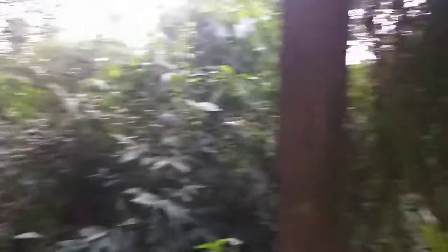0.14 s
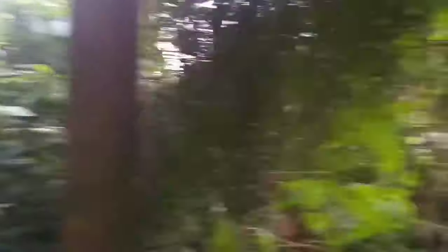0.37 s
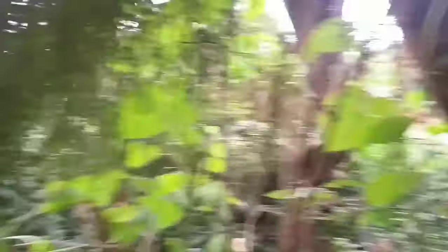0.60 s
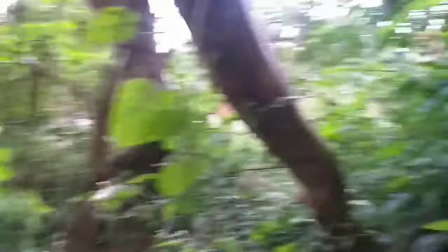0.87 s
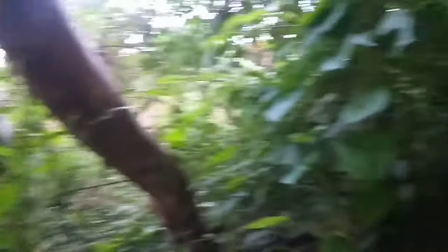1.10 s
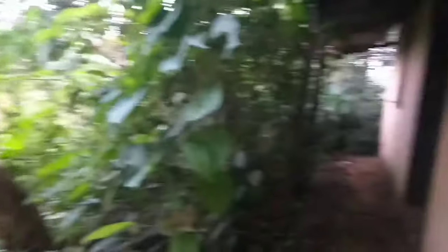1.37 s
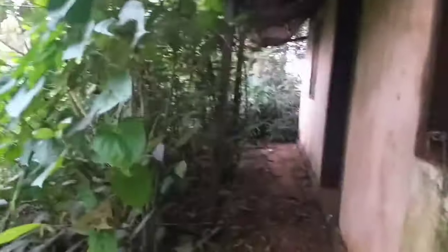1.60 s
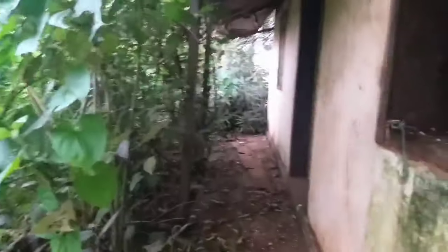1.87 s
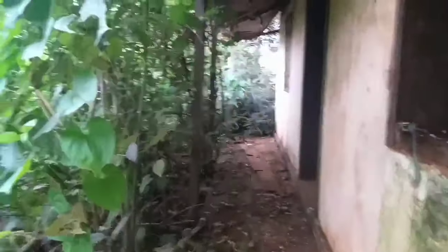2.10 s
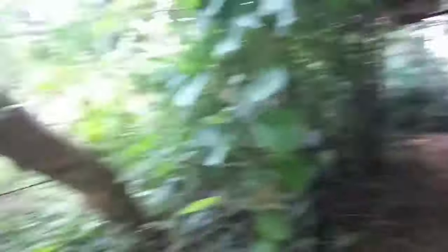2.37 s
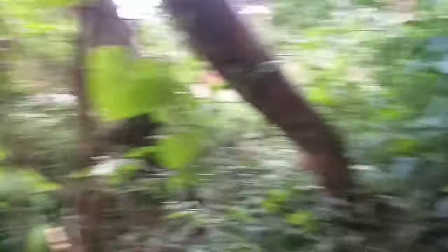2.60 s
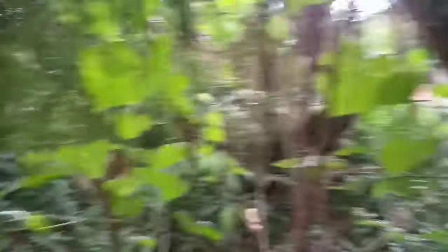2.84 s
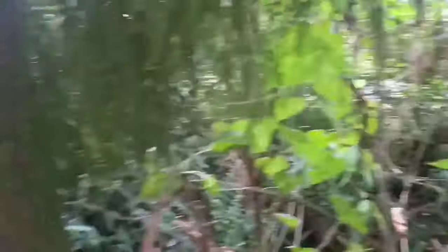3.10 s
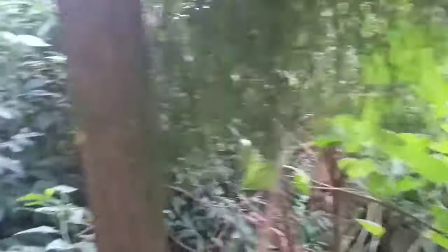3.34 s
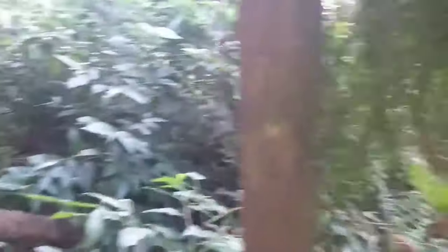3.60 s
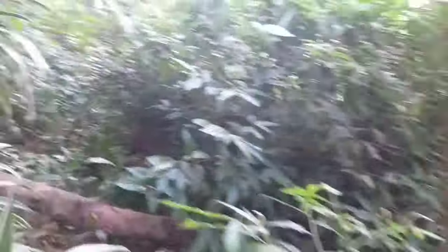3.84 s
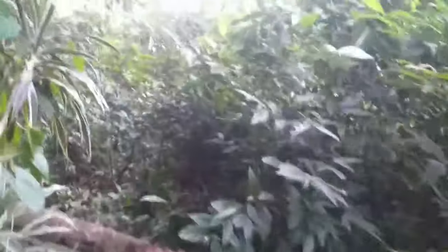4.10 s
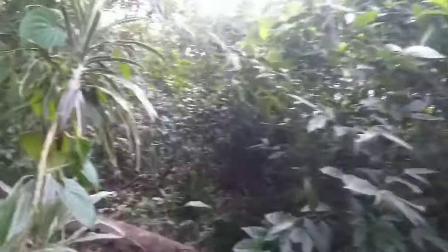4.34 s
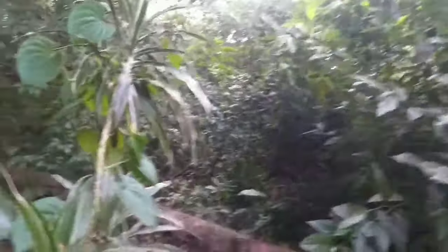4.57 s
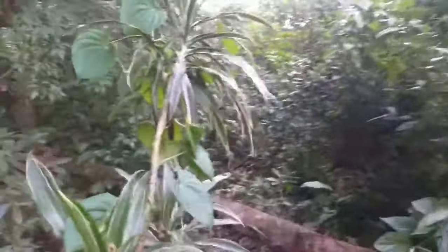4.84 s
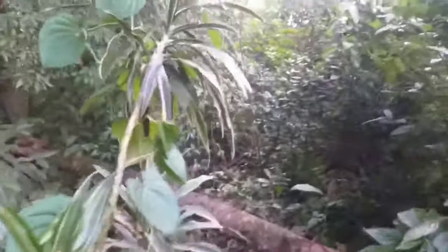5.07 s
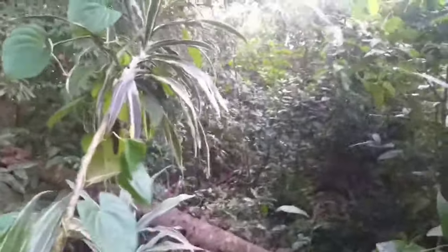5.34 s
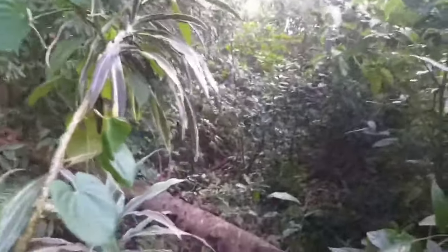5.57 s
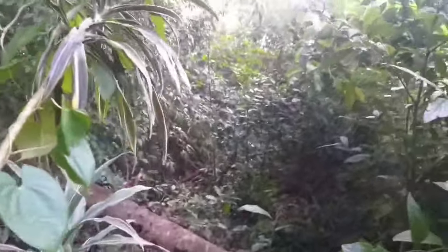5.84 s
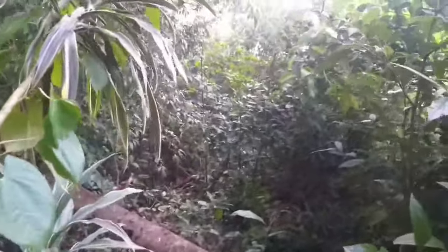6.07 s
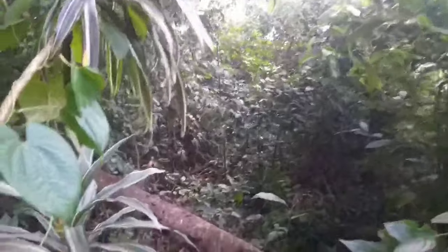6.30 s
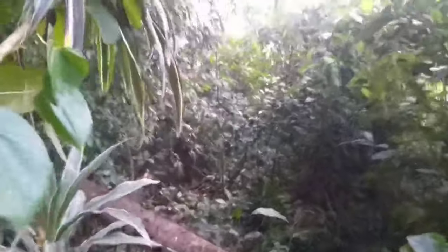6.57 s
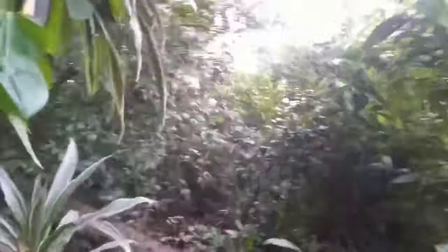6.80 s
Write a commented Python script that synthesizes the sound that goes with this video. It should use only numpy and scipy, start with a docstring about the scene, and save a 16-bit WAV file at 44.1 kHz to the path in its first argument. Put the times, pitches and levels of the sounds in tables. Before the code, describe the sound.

Close leaf swishes and dry litter crunches swell with each movement outdoors, building from near quiet to sharp twig cracks and a low microphone bump.

```python
"""In dense dry undergrowth, two close microphone ports hear nearly the same sound: still air as shaped noise,
a steady very high whine as a sine, and someone turning and pushing through the growth. Leaves and litter are
crackling noise that swells with each movement; twigs snap as short bursts with a ring, thickest late on.
A thin buzz of narrow noise comes in spells from 0.3 s; a bird whistles gliding sines far off from 1.4 s.
Near the end the microphone is bumped, a low lumpy noise."""
import sys
import numpy as np
from scipy import signal
from scipy.fft import rfft, irfft
from scipy.io import wavfile
from scipy.ndimage import uniform_filter1d

SR = 44100
rng = np.random.default_rng(int(sys.argv[2]) if len(sys.argv) > 2 else 0)


def makeup_ratio(level_db):
    """Linear amplitude ratio for a level in decibels (20 dB per factor of ten)."""
    decades = np.asarray(level_db, float) / 20
    return 10 ** decades


def output_pcm(signal):
    """Save a mono or channel-first signal as 16-bit PCM at the path in sys.argv[1].

    Samples are clipped to [-1, 1] before scaling.
    """
    pcm = np.clip(np.atleast_2d(signal).T, -1, 1) * 32767
    wavfile.write(sys.argv[1], SR, np.round(pcm).astype(np.int16))


N = 306054


def rms_one(x):
    """Scale to rms 1."""
    return x / np.sqrt(np.mean(x ** 2) + 1e-20)


def peak_one(x):
    """Scale to peak 1."""
    return x / np.abs(x).max()


def in_time(rows):
    """One value per sample for each column after the time, in straight lines between rows."""
    s, *columns = np.transpose(rows)
    return [np.interp(np.arange(N) / SR, s, column) for column in columns]


def colour(x, spectrum):
    """Shape a steady sound by a spectrum, in straight lines over log frequency."""
    hz, db = np.transpose(spectrum)
    grid = np.maximum(np.fft.rfftfreq(N, 1 / SR), 1)
    gain = makeup_ratio(np.interp(np.log(grid), np.log(hz), db))
    return irfft(rfft(x) * gain, N)


def band(x, low_hz, high_hz):
    """Band-pass."""
    return signal.sosfilt(signal.butter(2, [low_hz, high_hz], "band", fs=SR, output="sos"), x)


def resonance(x, hz, width_hz):
    """Two-pole resonance with a gain of about 1 at its top."""
    r = np.exp(-np.pi * width_hz / SR)
    poles = [1, -2 * r * np.cos(2 * np.pi * hz / SR), r * r]
    return signal.lfilter([(1 - r * r) / 2, 0, (r * r - 1) / 2], poles, x)


def fade(clicks, t60_s):
    """Each click jumps up and dies away, 60 dB in t60_s."""
    return signal.lfilter([1], [1, -makeup_ratio(-60 / (t60_s * SR))], clicks + 1e-18)


def drift(rate_hz):
    """Slow random wandering of rms 1."""
    r = np.exp(-2 * np.pi * rate_hz / SR)
    wander = signal.lfilter([1], [1, -2 * r, r * r], rng.standard_normal(N + SR))
    return rms_one(wander[SR:])   # the first second only settles the filter


def narrow(rows):
    """Noise twice through one resonance, under a bell-shaped swell."""
    out = np.zeros(N)
    for s, length, hz, width_hz, db in rows:
        a, b = max(round((s - .5) * SR), 0), min(round((s + .5) * SR), N)
        tone = resonance(resonance(rng.standard_normal(b - a), hz, width_hz), hz, width_hz)
        bell = np.exp(-.5 * ((np.arange(a, b) / SR - s) / length) ** 2)
        out[a:b] += makeup_ratio(db) * rms_one(tone) * bell
    return out


# Still air around the microphone, its spectrum. Each row: frequency in Hz, relative density in dB per Hz.
AIR = [(24, -34), (40, -1.5), (91, 6), (161, 1), (278, -9), (365, -9), (557, -11.5), (616, -14.5),
       (1430, -17), (2240, -22), (3100, -17.5), (12200, -32), (14100, -23), (15200, -12)]


def still_air():
    """Steady shaped noise, low-heavy; a second, weaker one differs between left and right."""
    air, apart = (makeup_ratio(-68.5) * rms_one(colour(n, AIR)) for n in rng.standard_normal((2, N)))
    highest = band(band(rng.standard_normal(N), 14300, 15750), 14300, 15750)
    side = makeup_ratio(-25) * band(apart, 20, 1500)
    return air + makeup_ratio(-94) * highest + side * np.array([[1], [-1]])


def whine():
    """A steady very high sine, wavering slightly in pitch and level."""
    hz = 15387 + 3.0 * drift(.4)
    level = makeup_ratio(-65.5 + 1.0 * drift(8))   # rms
    return np.sqrt(2) * level * np.sin(2 * np.pi * np.cumsum(hz) / SR)


# Movements close by. Each row: peak time in seconds, length in seconds, level in dB,
# weight in dB (more of the heavy layers), shine in dB (more of the bright ones).
# Green leaves swish past, about every 0.18 s while the person turns.
SWISHES = [(0.712, .05, -49, 17, -20), (0.735, 0.15, -44.5, 7, -2), (0.97, .16, -52.5, -6, 3),
           (1.21, 0.17, -49.5, -24, -5), (3.103, 0.16, -43.5, 4, 0), (3.277, 0.17, -41.5, -9, -1),
           (3.452, 0.19, -42.5, -23, 2), (3.614, 0.18, -43.5, 13, 8), (3.782, 0.24, -40.5, 12.5, 3.5),
           (3.997, 0.18, -39, -15, 3), (4.16, .22, -42.5, 3, 5), (4.346, 0.21, -40.5, -26, 3),
           (5.913, 0.027, -45.5, 7, 2)]
# Whole branches are shoved aside.
SHOVES = [(0.0, 0.19, -58, 11, -3.5), (0.08, 0.12, -65, -3, 5), (0.194, 0.061, -66, 5, -1),
          (0.81, 0.23, -53.5, -13, -0.5), (0.929, 0.1, -41, -8, -5), (2.605, 0.18, -50, 7, 3),
          (3.725, 0.38, -50, 8, -2.5), (3.855, .17, -37, 0, -1.5), (3.946, 0.19, -48.5, -0.5, -5),
          (4.527, 0.11, -39, 4, 5.5), (4.732, 0.17, -45, 3, -2), (5.286, 0.14, -48.5, -1, -0.5),
          (5.567, 0.34, -47, 1.5, -2.5), (6.504, 0.39, -52.5, -9, 1.5), (6.753, .17, -33, 6.5, 3),
          (6.82, 0.12, -42, 11, -20), (6.881, 0.24, -42.5, 0, 0.5)]
# Dry litter crunches underfoot.
CRUNCHES = [(0.056, .12, -68, 0, -7), (0.164, 0.092, -60.5, -3, -15), (0.365, 0.16, -68, 11, 2.5),
            (2.699, 0.11, -57.5, 0, 5.5), (2.845, 0.044, -50, -6, -0.5), (2.89, 0.13, -57.5, 10, -2),
            (2.968, 0.19, -54.5, 1, -0.5), (3.053, 0.12, -59.5, 3, 0), (3.197, 0.23, -56.5, 0, 2),
            (3.317, 0.051, -52.5, -6, 5), (4.084, 0.36, -51.5, 3.5, 3), (4.579, 0.2, -39.5, 4.5, 0.5),
            (4.677, 0.097, -49.5, 21, 8), (4.83, .13, -63, -12, 3), (5.018, 0.6, -54, 3, 0.5),
            (5.148, .14, -62, -11, 8.5), (5.353, 0.12, -45, 1.5, -2.5), (5.458, .12, -52, 0, 2.5),
            (5.668, 0.12, -46.5, 4.5, -3.5), (5.766, 0.053, -54.5, -16, 10.5), (5.832, 0.31, -51, 2, -2),
            (5.976, 0.12, -53, -21, 4.5), (6.02, .1, -47, -10, -29), (6.163, 0.48, -54, 8.5, 3.5),
            (6.265, 0.2, -50, 3, -5), (6.376, 0.42, -52.5, -12, 2), (6.424, 0.19, -50.5, -16.5, -2),
            (6.604, 0.29, -48, 0, 1.5), (6.666, 0.17, -44.5, 10, 0), (6.711, 0.16, -38, 10, -3)]
# Thick stems bend and knock.
BENDS = [(.13, 0.59, -70, 2, 0), (0.301, 0.25, -63.5, 2.5, 1), (2.802, 0.18, -77, 3, 0),
         (3.592, 0.031, -53, 3, 0), (3.657, 0.052, -65, 0, 0), (3.9, 0.24, -62, 0, 0),
         (4.591, 0.072, -48.5, 6.5, 4), (5.085, 0.1, -62, -4, 0), (5.274, 0.18, -64, 1.5, 3)]
# One row per kind: swish, shove, crunch, debris, bend.
# Each row: share of the length spent rising, roundness of the top, dryness from 0 to 1.
MOVES = [(0.34, 1.33, 0.2), (0.47, 1.41, 0.37), (.45, 1.53, 0.83), (0.37, 0.84, 0.65), (.3, 0.68, 0.7)]
# What each layer takes of the movements, from stems to leaf edges. Each row: swish, shove, crunch, debris,
# bend and settling in dB, then the share of weight and the share of shine.
TAKES = [(-42, -24.5, -31, -14, -2, -23, 1.04, 0.25), (-28, -11, -16.5, 1.8, -9, -16, 0.68, .0),
         (-8.5, -2.5, -3, -10, -18, -5, 0.18, .0), (-8, 0, -1.6, 7.3, -22, -11, 0.073, 0.19),
         (-2, -6, -10.5, 3, -28, -13, 0.01, 0.59), (-13, -2, -6, 4, -28, -9, 0.078, 1.17),
         (-21, -7.5, -13, 2.5, -32, -12, 0.18, 1.37)]
# The undergrowth settles between movements. Each row: time in seconds, level in dB.
SETTLE = [(0, -74), (.3, -63.5), (.5, -72), (.66, -70.5), (1.1, -73), (1.4, -76), (2.43, -80.5), (2.8, -65),
          (3.4, -65), (4.3, -66.5), (4.9, -68), (5.2, -56.5), (5.7, -69), (6.2, -67), (6.94, -57.5)]
SETTLE_DRYNESS = 0.72


def pushing():
    """Every movement swells and dies by one rule; powers add up in each layer, dryness mixes by power."""
    t, takes = np.arange(0, N, 128) / SR, np.array(TAKES)
    weight_share, shine_share = takes[:, [6]], takes[:, [7]]
    # bits rain down just after every snap
    debris = [(s + 0.033, 0.13, db - 47, 0, 0) for s, db, *_ in SNAPS]
    settle = makeup_ratio(np.interp(t, *np.transpose(SETTLE))) ** 2
    power = makeup_ratio(takes[:, [5]]) ** 2 * settle
    dry_power, total = SETTLE_DRYNESS * settle, settle
    kinds = [SWISHES, SHOVES, CRUNCHES, debris, BENDS]
    for kind, (rows, (rising, roundness, dryness)) in enumerate(zip(kinds, MOVES)):
        for s, length, db, weight_db, shine_db in rows:
            away = np.maximum((s - t) / rising, (t - s) / (1 - rising)) / length
            swell = makeup_ratio(db - 20 * away ** roundness) ** 2   # 20 dB down at both ends of the length
            gain_db = takes[:, [kind]] + weight_db * weight_share + shine_db * shine_share
            power = power + swell * makeup_ratio(gain_db) ** 2
            dry_power, total = dry_power + dryness * swell, total + swell
    curves = [*np.sqrt(power), dry_power / total]
    return [np.interp(np.arange(N) / SR, t, curve) for curve in curves]


# Layers of the rustle, from stems to leaf edges. Each row: low edge in Hz, high edge in Hz,
# crackles per second, crackle depth in dB per unit of size, crackle decay (t60) in seconds.
LAYERS = [(304, 728, 53, 1.5, 0.25), (696, 1594, 150, 6.5, 0.011), (1540, 2880, 120, 4.5, 0.029),
          (2700, 4620, 180, 7.5, 0.0038), (4060, 6640, 260, 0.5, 0.037), (5800, 10400, 160, 3.5, 0.023),
          (10130, 14200, 460, 3.5, 0.044)]
# Broad resonances of the rustle. Each row: frequency in Hz, relative density in dB per Hz.
BRUSH = [(150, -39), (260, -11), (460, -6), (800, -7), (1350, -2), (1900, 5), (2600, -1.5), (3450, -1.5),
         (4300, -7), (5200, -6.5), (6600, -9), (8300, -4), (10300, -17), (15700, -14)]


def brush():
    """Rubbing noise broken up by crackles of very uneven size; one crackle is heard in several layers at once."""
    out = 0
    chance, size = rng.random(N), np.minimum(rng.exponential(1, N), 3)
    *levels, dryness = pushing()
    for level, (low_hz, high_hz, per_s, depth_db, t60_s) in zip(levels, LAYERS):
        crackles = (chance < per_s / SR) * makeup_ratio(depth_db * size) * dryness
        texture = (1 + fade(crackles, t60_s)) * makeup_ratio(1.32 * drift(26.5))
        # crackling takes its energy from the smooth rubbing
        texture = texture / np.sqrt(uniform_filter1d(texture ** 2, size=SR // 8))
        rub = colour(rng.standard_normal(N) * texture, BRUSH)
        rub = band(band(rub, low_hz, high_hz), 0.67 * low_hz, 1.15 * high_hz)
        # single leaves and twigs ring out by turns, so the colour keeps shifting
        for hz in np.geomspace(low_hz, high_hz, 6)[1:-1]:
            ring_gain = makeup_ratio(-11.5 + 3.3 * np.clip(drift(9.3), -2, 2))
            rub = rub + ring_gain * resonance(rub, hz, 0.085 * hz)
        out = out + level * rms_one(rub)
    return out


# Rubbed stems and leaves close by. Each row: middle in seconds, length (bell spread) in seconds,
# pitch in Hz, width in Hz, level at the middle in dB.
SINGING = [(.1, 0.15, 1880, 350, -63), (.16, 0.062, 3560, 350, -68), (.36, .03, 1950, 300, -56.5),
           (.73, 0.016, 5150, 500, -43.5), (.72, 0.013, 2510, 400, -52), (.93, 0.012, 2020, 400, -46),
           (1.03, 0.035, 5200, 600, -66), (2.842, 0.0053, 1600, 400, -43.5), (3.1, 0.016, 5000, 500, -52),
           (3.13, 0.061, 1470, 400, -64.5), (3.44, 0.022, 1950, 400, -55), (4.96, 0.01, 1930, 200, -62),
           (5.98, 0.0093, 3280, 400, -47)]


def singing():
    """A rubbed stem or leaf sings in one narrow band."""
    return narrow(SINGING)


# Twig snaps, the loud ones near. Each row: time in seconds, peak level in dB, ring in Hz,
# low part in dB and high part in dB (both before the fixed gains in snaps()).
SNAPS = [(0.153, -46, 2020, -31, -21), (0.184, -41.5, 3520, -21, -3), (0.361, -38, 1920, -38, -20),
         (0.375, -43, 1880, -33, -20), (0.711, -43, 2580, -21, -26), (0.725, -45, 2580, -45, -27),
         (0.911, -32, 2030, -29, -23), (0.92, -33.5, 1900, -29, -24), (2.205, -57.5, 1950, -3, -20),
         (2.68, -29, 3800, -43, -6.5), (2.686, -36, 3740, -39, -23), (2.834, -32.5, 1900, -49, -21),
         (2.861, -37, 1820, -49, -22), (2.912, -39, 1770, -33, -11), (2.933, -32, 1900, -39, -11),
         (2.967, -32, 1900, -37, -9), (3.058, -37, 3380, -30, -23), (3.21, -38, 2730, -30, -8),
         (3.59, -27, 3500, -21.5, -17), (3.663, -29, 3110, -15, -11), (3.863, -21, 1890, -39, -19),
         (4.032, -25, 3250, -36, -13), (4.081, -13.5, 3260, -63, -13), (4.368, -33.5, 3600, -32, -24),
         (4.482, -29, 1890, -27, -13), (4.5, -20.5, 4200, -31, -15), (4.619, -25.5, 2850, -23, -22),
         (4.663, -27.5, 2880, -6.5, -15), (4.74, -35, 3160, -11, -10), (4.763, -5, 1250, -21, -13.5),
         (4.819, -13.5, 4400, -29, -7.5), (4.918, -40, 2920, -32, -16), (5.009, -34, 1920, -39, -2),
         (5.043, -40, 1970, -6, -1), (5.062, -19.5, 3800, -14.5, -7.5), (5.109, -28.5, 2010, -39, -17),
         (5.138, -35, 3610, -34, -15), (5.145, -28.5, 3300, -53, -8.5), (5.439, -36, 3500, -21, -16),
         (5.528, -27.5, 3300, -23.5, -29), (5.612, -26.5, 3000, -38, -25), (5.678, -32, 3570, -37, -28),
         (5.748, -32.5, 3700, -33, -8.5), (5.78, -34, 3190, -33, -26), (5.829, -27, 3000, -37, -22),
         (5.886, -17.5, 3630, -54, -7), (5.956, -33.5, 3800, -40, -1), (5.977, -38, 3250, -38, -28),
         (6.048, -3.5, 1690, -20.5, -19), (6.101, -18.5, 2000, -20.5, -23), (6.24, -52, 3070, -8, 6),
         (6.272, -8.5, 3630, -23, -10.5), (6.335, -28, 2010, -21, -10), (6.423, -28, 3820, -38, -14),
         (6.544, -37, 3150, -39, -16), (6.596, -23, 3430, -50, -10), (6.643, -26, 1900, -37, -24),
         (6.672, -25, 2940, -22, -24), (6.717, -8.5, 3450, -42, -36), (6.729, -1.5, 2530, -52, -4.5),
         (6.762, -1, 3220, -27, -8.5), (6.808, -19, 1950, -18.5, -22), (6.921, -25, 2770, -41, -22)]
# Edges between the low, middle, high and top parts of a snap [Hz].
SNAP_EDGES = [380, 1300, 4500, 10500, 16800]


def snaps():
    """Fibres tear for under a millisecond and crack, the twig rings briefly, leaves and wall scatter a tail."""
    out, t = np.zeros(N), np.arange(SR // 5) / SR
    noise = rng.standard_normal((len(SNAPS), 2, len(t)))
    tear = np.clip(t / 0.00084, 0, 1) ** 2
    for (s, peak_db, ring_hz, low_db, high_db), (burst, scatter) in zip(SNAPS, noise):
        tail = makeup_ratio(-15.5) * scatter * makeup_ratio(-60 * t / 0.1)   # t60 0.1 s
        crack = tear * (burst * makeup_ratio(-60 * t / 0.018) + tail)
        crack[round(.0007 * SR)] += 4.0   # the break itself
        low, middle, high, top = (band(crack, *edges) for edges in zip(SNAP_EDGES, SNAP_EDGES[1:]))
        middle = middle + makeup_ratio(10.0) * resonance(crack, ring_hz, 640)
        # thick twigs sound low, thin ones high
        shaped = makeup_ratio(low_db + 3.5) * peak_one(band(low, 300, 2500)) + peak_one(middle)
        shaped = shaped + makeup_ratio(high_db + 12.0) * peak_one(high)
        # loud snaps are near and keep more of their top, thin ones too
        shaped = shaped + makeup_ratio(11.5 + 0.44 * peak_db + 0.87 * high_db) * peak_one(top)
        at = round(s * SR)
        out[at:at + len(t)] += (makeup_ratio(peak_db) * peak_one(shaped))[:N - at]
    return out


# Spells of insect buzzing. Each row: start in seconds, end in seconds, level in dB.
BUZZ = [(.3, 1.2, -82), (1.36, 2.06, -86), (2.74, 3.1, -78)]


def buzzing():
    """A thin insect buzz: narrow noise of uneven level, broken into spells."""
    hz, width_hz = 5630, 120
    buzz = resonance(resonance(rng.standard_normal(N), hz, width_hz), hz, width_hz)
    t = np.arange(N) / SR
    spells = 0
    for start, end, db in BUZZ:
        spells = spells + makeup_ratio(db) * np.clip(np.minimum(t - start, end - t) / 0.042, 0, 1)
    return spells * makeup_ratio(1.5 * drift(7.2)) * rms_one(buzz)


# A bird far off, two slurred phrases. Each row of a phrase: time in seconds, pitch in Hz,
# level in dB before flutter and echo.
BIRD = [
    [(1.41, 2130, -80), (1.46, 2120, -70), (1.52, 2080, -84), (1.575, 2160, -64.5), (1.62, 2200, -83),
     (1.68, 2350, -74), (1.75, 2740, -68), (1.8, 2780, -89)],
    [(1.91, 2730, -76), (1.93, 2660, -69), (1.97, 2475, -72), (2.05, 2300, -84), (2.13, 2070, -77),
     (2.22, 2170, -82), (2.3, 2330, -78), (2.36, 2570, -74), (2.43, 2700, -84)],
]
# Short far notes. Each row: middle in seconds, length (bell spread) in seconds, pitch in Hz, width in Hz,
# level at the middle in dB.
NOTES = [(1.747, 0.042, 2420, 60, -74), (1.79, 0.04, 7560, 900, -71.5), (2.078, 0.031, 643, 45, -73)]


def birds():
    """Gliding whistles blurred by echoes among the trees, and a few short notes."""
    t, out = np.arange(N) / SR, np.zeros(N)
    for phrase in BIRD:
        hz, db = in_time(phrase)
        on = np.clip(np.minimum(t - phrase[0][0], phrase[-1][0] - t) / 0.021, 0, 1)
        whistle = np.sin(2 * np.pi * np.cumsum(hz + 65.0 * drift(60.4)) / SR)
        out += on * makeup_ratio(db) * whistle * makeup_ratio(3.0 * drift(25))
    trees = rng.standard_normal(SR // 2) * makeup_ratio(-60 * t[:SR // 2] / .3)   # t60 0.3 s
    echoes = signal.fftconvolve(out, trees / np.sqrt(np.sum(trees ** 2)))[:N]
    return out + makeup_ratio(-2.5) * echoes + narrow(NOTES)


def bump():
    """The microphone is bumped: low lumpy noise builds up and dies at steady rates in dB per second."""
    late = np.arange(N) / SR - 6.74   # seconds from the peak of the jolt
    level_db = -49 + np.minimum(260 * late, -110 * late)
    return makeup_ratio(level_db) * rms_one(band(band(rng.standard_normal(N), 76, 320), 50, 370))


def scene():
    """Everything in the middle; only the still air differs slightly between the sides."""
    middle = whine() + brush() + singing() + snaps() + buzzing() + birds() + bump()
    return still_air() + middle


def top_cut(x):
    """Nothing passes above the cut-off."""
    return signal.sosfilt(signal.butter(12, 16960, fs=SR, output="sos"), x)


# The two microphone ports, left minus right. Each row: resonance in Hz, width in Hz, level in dB.
PORTS = [(1890, 580, -11.5), (9800, 800, -10)]


def record(dry):
    """The ports resonate a little differently, so the left is louder in two bands; each hisses on its own."""
    mid = dry.mean(axis=0)
    side = 0
    for hz, width_hz, db in PORTS:
        side = side + makeup_ratio(db) * resonance(resonance(mid, hz, width_hz), hz, width_hz)
    hiss = makeup_ratio(-81) * band(rng.standard_normal((2, N)), 260, 15000)
    heard = dry + side * np.array([[1], [-1]]) + hiss
    # steep low-pass, 60 dB down from 17.1 kHz
    heard = signal.sosfilt(signal.cheby2(12, 60, 17100, fs=SR, output="sos"), heard)
    return top_cut(heard)


dry = scene()
out = record(dry)
output_pcm(out)
```